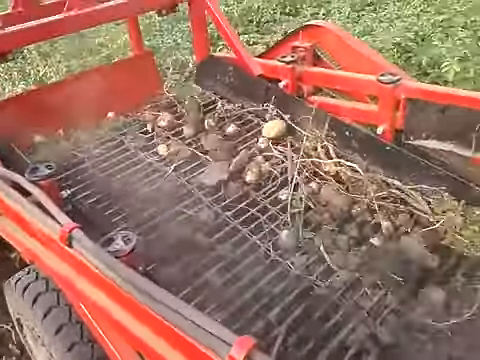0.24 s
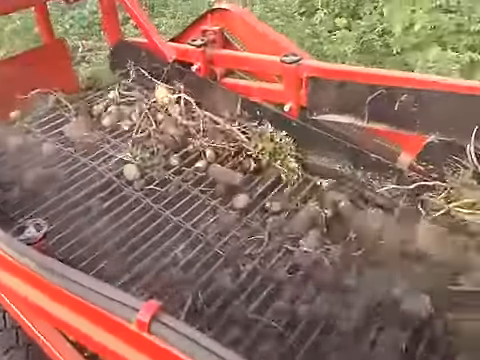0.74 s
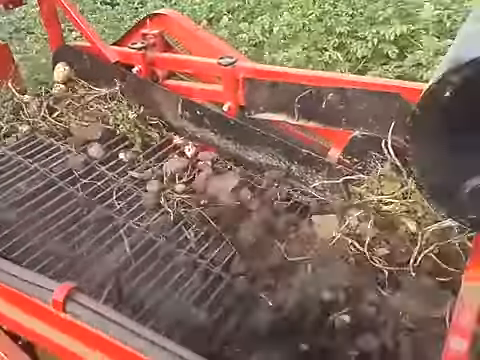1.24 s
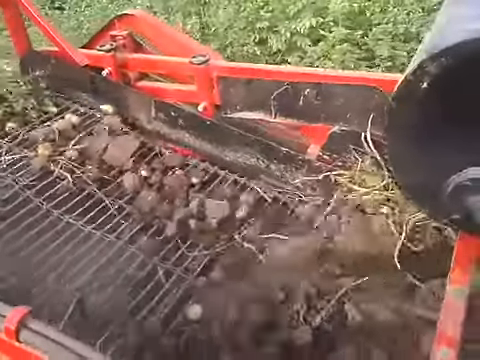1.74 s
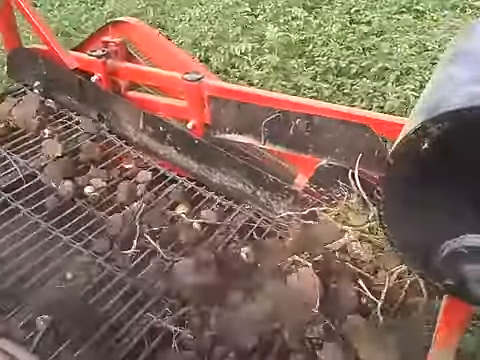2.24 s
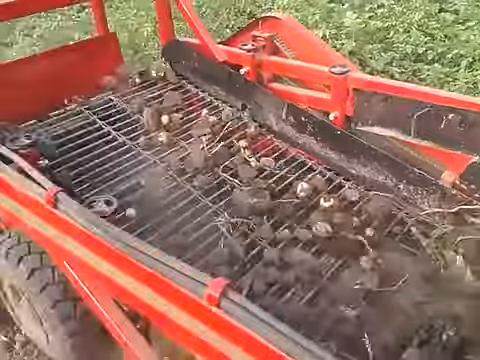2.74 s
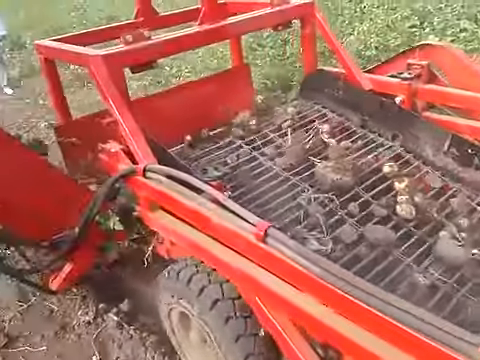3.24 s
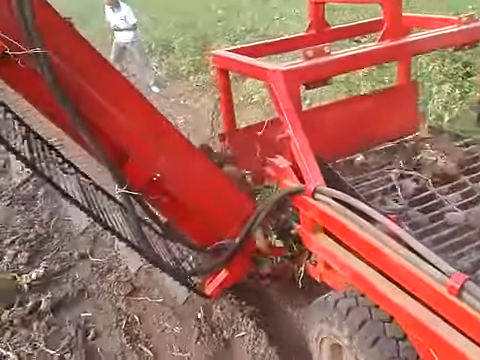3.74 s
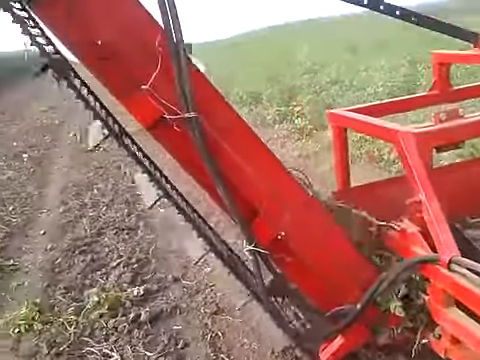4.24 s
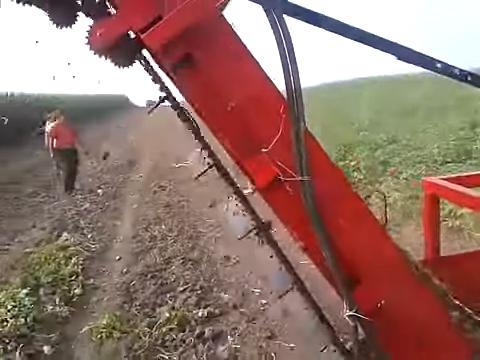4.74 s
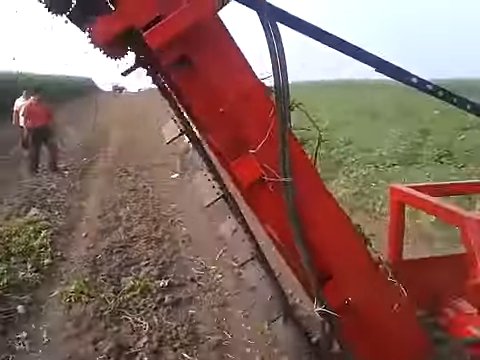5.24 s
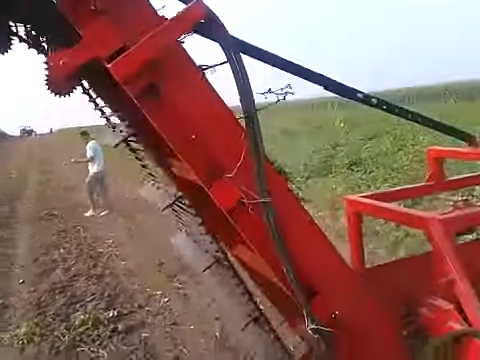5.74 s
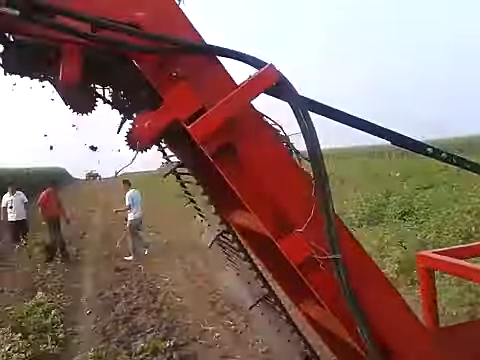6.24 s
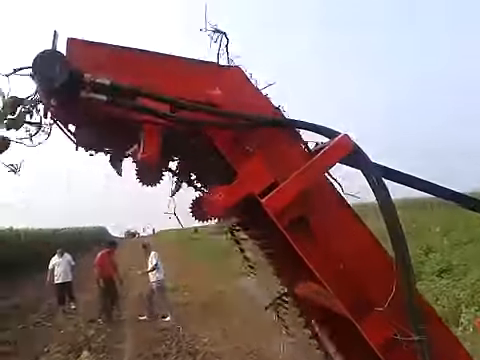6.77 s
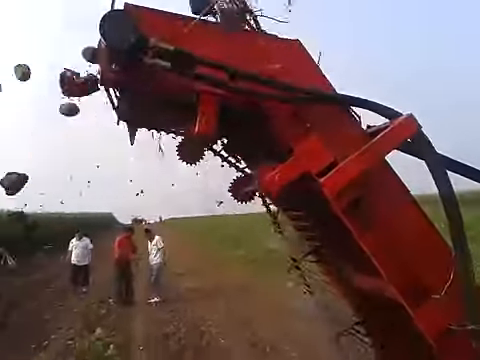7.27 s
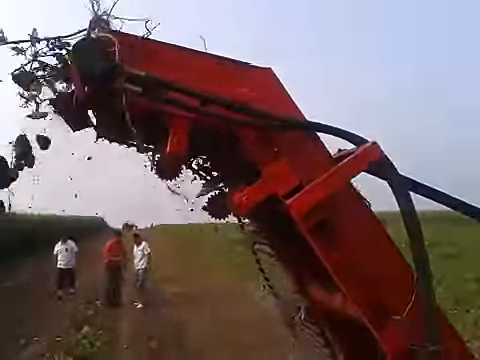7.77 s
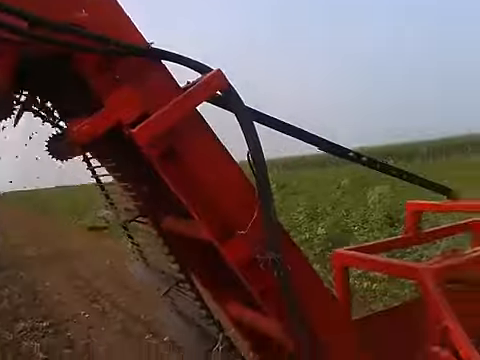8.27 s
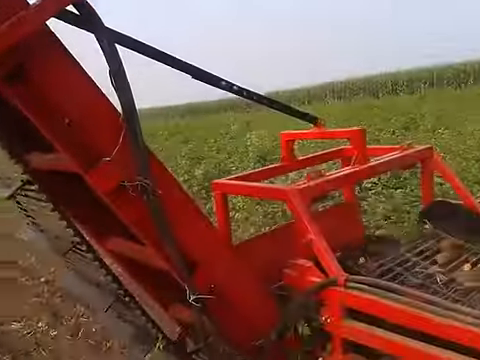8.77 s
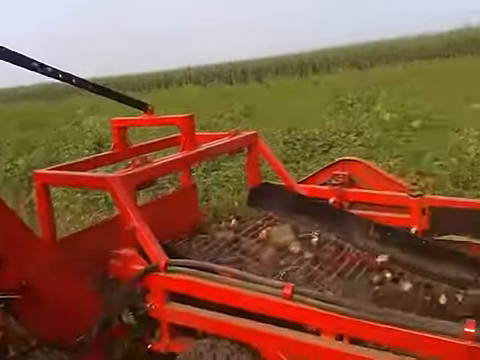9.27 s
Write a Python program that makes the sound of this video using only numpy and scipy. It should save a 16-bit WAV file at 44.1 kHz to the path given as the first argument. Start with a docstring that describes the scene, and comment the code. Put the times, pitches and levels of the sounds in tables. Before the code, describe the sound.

Continuous rough roar of earth tumbling on a shaking metal sieve, rods knocking about eighteen times a second, with hissing grit and thin squeaks.

```python
"""A rough roar of soil and clods over the rod web of a potato harvester, with rods knocking 18 times a second.
The soil layers are flickering coloured noise; the steel frame is noise through narrow resonances. Each rod slaps
the sprocket with a noise rattle and a short clank; dry links squeak as brief rising tones, small parts clatter as
short rings, and now and then a low thump comes through. Heard from the tractor platform by a small mono
microphone that overloads on the peaks."""
import sys
import numpy as np
from scipy import signal
from scipy.fft import rfft, irfft, next_fast_len
from scipy.io import wavfile
from scipy.ndimage import uniform_filter1d

SR = 44100
rng = np.random.default_rng(int(sys.argv[2]) if len(sys.argv) > 2 else 0)


def unload_wav(signal):
    """Save mono or channel-first audio to the path in sys.argv[1] as 16-bit WAV at rate SR, clipped to [-1, 1]."""
    wavfile.write(
        sys.argv[1],
        SR,
        np.round(np.clip(np.atleast_2d(signal).T, -1, 1) * 32767).astype(np.int16),
    )


N = 419391

# progress of the rods past the sprocket: time_s [s], rods_passed [count so far]
ROD_PROGRESS = [(0, .25), (3.5, 63.88), (5.5, 100.13), (6, 109.0), (7.5, 136.32), (8.3, 150.66),
                (9.5, 172.25)]
# spectrum of fine grit, and of the thin ticks of the rods: freq_hz [Hz], level_db [dB]
GRIT_SPECTRUM = [(6500, -39), (8500, 5.5), (11000, 1.5), (13000, -9.5), (15700, -6)]


def undb(db):
    """Decibels to gain."""
    return 10 ** (np.asarray(db) / 20)


def unit(x):
    """Scaled to rms 1."""
    return x / np.sqrt(np.mean(x ** 2))


def colour(x, points):
    """Shapes x with a spectrum of (Hz, dB) points, joined straight on a log frequency axis."""
    size = next_fast_len(N)
    hz, db = np.transpose(points)
    log_hz = np.log(np.maximum(np.arange(size // 2 + 1) * SR / size, 1))
    gain = undb(np.interp(log_hz, np.log(hz), db, left=-80))
    return irfft(rfft(x, size) * gain, size)[:N]


def coloured_noise(points):
    """White noise shaped by a spectrum, rms 1."""
    return unit(colour(rng.standard_normal(N), points))


def walk(rate):
    """Random levels joined smoothly, rate new ones a second; spread near 1."""
    step = int(SR / rate)
    levels = rng.standard_normal(N // step + 2)
    joined = np.interp(np.arange(N) / step, np.arange(N // step + 2), levels)
    return 1.6 * uniform_filter1d(joined, step)


def stream(points, flicker_db, rate):
    """Dense falling soil: coloured noise whose level flickers."""
    return undb(flicker_db * walk(rate)) * coloured_noise(points)


def ring(x, hz, width_hz):
    """x through one resonance, rms 1."""
    return unit(signal.lfilter(*signal.iirpeak(hz, hz / width_hz, SR), x))


def bursts(s, db, t60, rise_s):
    """Envelope that rises quickly at each time and dies away."""
    hits = np.zeros(N)
    at = np.clip((np.asarray(s) * SR).astype(int), 0, N - 1)
    np.add.at(hits, at, undb(db))
    t = np.arange(int(.15 * SR)) / SR
    shape = (1 - np.exp(-t / rise_s)) * np.exp(-np.log(1000) * t / t60)
    return signal.fftconvolve(hits, shape)[:N]


def add(out, s, hz, db, half_s, glide):
    """Adds a bell-shaped blip of tone centred on s; positive glide rises, negative falls."""
    t = np.arange(-int(half_s * SR), int(half_s * SR)) / SR
    at = int(s * SR) - len(t) // 2
    if at >= 0 and at + len(t) <= N:
        tone = np.sin(2 * np.pi * hz * t * (1 + glide * t / half_s))
        out[at:at + len(t)] += undb(db) * np.hanning(len(t)) * tone


def grains(s, hz, db, t60, rough, size=600):
    """Short rings, each with its own pitch and decay, faded out by size samples; rough blurs them to a scrape."""
    t = np.arange(size) / SR
    hz, db, t60 = (np.asarray(v)[:, None] for v in (hz, db, t60))
    wander = rough * np.cumsum(rng.standard_normal((len(s), len(t))), axis=1)
    attack = 1 - np.exp(-t * hz / 2.3)
    decay = np.exp(-np.log(1000) * t / t60) * (1 - t / t[-1])
    tone = np.sin(2 * np.pi * hz * t + wander) * attack * decay
    at = (np.asarray(s)[:, None] * SR).astype(int) + np.arange(len(t))
    return np.bincount(at.ravel(), (undb(db) * tone).ravel(), N + 2 * len(t))[:N]


def scattered(count, *ranges):
    """Random rows: a time, then one value from each range."""
    lo, hi = np.transpose([(0, N / SR), *ranges])
    return lo + (hi - lo) * rng.random((count, len(lo)))


def rod_times(jitter_s):
    """When each rod passes the sprocket, slightly uneven."""
    s, count = np.transpose(ROD_PROGRESS)
    even_s = np.interp(np.arange(1, int(count[-1]) + 1), count, s)
    return even_s + jitter_s * rng.standard_normal(len(even_s))


def clod_tumble(body):
    """Clods tumbling on the web: mid-range noise, stirred by the slaps, receding as the microphone turns away."""
    # freq_hz [Hz], level_db [dB]
    tumble_spectrum = [(350, -4), (550, -17), (680, 1.5), (1000, 5), (1250, 3.5), (1600, -2.5),
                       (2500, -23.5)]
    start_db, fade_db_per_s = -17.5, 0.33  # before the stirring
    level = undb(start_db - fade_db_per_s * np.arange(N) / SR)
    return level * (.75 + 0.95 * body) * stream(tumble_spectrum, 0.58, 13)


def soil_rush(body):
    """Soil rushing over the rods: brighter noise, stirred by the slaps, that drops abruptly and slowly fades."""
    # freq_hz [Hz], level_db [dB]
    rush_spectrum = [(700, -27), (1100, -4), (1500, -1), (2000, 2), (2600, -3.5), (3200, -5.5), (4500, -7),
                     (6000, -25)]
    start_db, drop_db, fade_db_per_s = -14.5, 6.5, 0.16  # before the stirring
    t = np.arange(N) / SR
    dropped = np.interp(t, (1.81, 1.84), (0, 1))  # s
    level = undb(start_db - drop_db * dropped - fade_db_per_s * t)
    return level * (0.93 + 0.84 * body) * stream(rush_spectrum, 0.79, 14)


def web_hiss():
    """Hiss of the rod web: flickering treble noise that comes up early on."""
    # freq_hz [Hz], level_db [dB]
    hiss_spectrum = [(1500, -45), (2200, -2), (3700, -2), (4600, -0.5), (5600, 1.5), (6500, -4.5),
                     (7700, -10), (9500, -17), (12000, -36)]
    full_db, rise_db = -17.5, 2.5
    still_to_rise = np.interp(np.arange(N) / SR, (1.2, 1.5), (1, 0))  # s
    return undb(full_db - rise_db * still_to_rise) * stream(hiss_spectrum, 1.0, 16)


def frame(shake):
    """Panel rings, shaken by the load and harder at each knock; each comes and goes."""
    # rings of the panels: pitch_hz [Hz], width_hz [Hz], level_db [dB],
    # drift_db_per_s [dB per s, about mid-scene, as the microphone turns]
    panel_rings = [(209, 14, -46, 0.4), (246.5, 4.6, -45, 1), (296, 12, -42.5, 0.3),
                   (369, 19.5, -32.5, 0.2), (435, 16, -33.5, 0), (505, 49, -30.5, 0.15),
                   (573, 28, -32, -0.66), (659, 12.4, -31, 0.87), (704.4, 20, -28.5, -.5),
                   (785, 15, -30.5, -0.7), (861, 34, -31, 0), (887.6, 9.9, -31.5, 0), (999, 25, -28.5, -.3),
                   (1155, 9.1, -36, -2.3)]
    # how strongly the panels reach the turning microphone: time_s [s], level_db [dB]
    panel_facing = [(.5, -2), (1.3, 0), (2.2, 1), (3.2, 1), (4.5, -1.5), (6.5, -2.5), (8, -1)]
    out, t = 0, np.arange(N) / SR
    facing_db = np.interp(t, *np.transpose(panel_facing))
    for hz, width_hz, db, drift_db_per_s in panel_rings:
        drift_db = drift_db_per_s * (t - t[-1] / 2)
        swell = undb(db + facing_db + drift_db + 2.14 * walk(2.97))
        load = (1 + 0.65 * shake) * rng.standard_normal(N)
        out = out + swell * ring(load, hz, width_hz)
    return out


def slaps():
    """Rods slapping the sprocket: rows of time, strike level, brightness and pitch."""
    # hard or bright slaps at set times: time_s [s], strike_db [dB], brightness_db [dB], pitch_hz [Hz]
    set_slaps = [(0.0385, -5.5, 9, 5070), (0.2045, -3.5, -2, 4920), (0.264, -4.5, 0, 5100),
                 (0.3739, -6, 4.5, 4860), (0.4295, -5.5, -1.5, 4930), (0.817, -4, 0, 4570),
                 (1.101, -4.5, -1, 4880), (1.2043, -9, 7, 4930), (1.2525, -4.5, 2, 4730),
                 (1.4191, -5, 2, 5080), (1.852, -4.5, 3, 5600), (2.0829, -4.5, 3, 5620),
                 (2.135, -1.5, 1, 5080), (2.191, -4.5, -2, 4750), (2.521, -5, .5, 4760),
                 (2.676, -6, 0, 6060), (2.731, -6, 4.5, 5470), (2.9578, -5, 6, 5950),
                 (3.1247, -5.5, 8, 5700), (3.2346, -4.5, 6, 5220), (3.5618, -4.5, 6, 5340),
                 (3.9562, -5, 0, 5100), (4.0059, -5, .5, 4880), (4.836, -5, -5.5, 4260),
                 (5.0427, -5.5, 1.5, 5140), (5.129, -2.5, -1, 5400), (5.3235, -5.5, 1, 5430),
                 (6.119, -5, 9, 4920), (6.6055, -5.5, 1, 5630), (6.764, -6, 1, 5530), (7.428, -6, -6, 5190),
                 (8.428, -4.5, 2, 5630), (8.4902, -4.5, 6, 5500), (9.435, -5.5, 5, 5700)]
    placed = np.transpose(set_slaps)
    rod_s = rod_times(jitter_s=.005)
    chance = rng.standard_normal((3, len(rod_s)))
    rod_db = np.minimum(-9 + 2.5 * chance[0], -6.5)  # capped
    rod_hz = 5196 + 500 * chance[2]
    regular = np.array([rod_s, rod_db, 2.0 * chance[1], rod_hz])
    apart = np.abs(rod_s[:, None] - placed[0]).min(axis=1) > .02  # s, a set slap replaces a regular one
    return np.c_[placed, regular[:, apart]]


def beat(s, db, bright_db):
    """Envelopes of the slaps: a longer body and a shorter bright edge."""
    body = bursts(s, db, t60=.1, rise_s=.002)
    edge = bursts(s, db + bright_db, t60=0.055, rise_s=0.0037)
    return body, edge


def knocks(body, edge, s, db, hz):
    """Each slap is a short rattle and a clank at the pitch of its rod."""
    # rattle: freq_hz [Hz], level_db [dB]
    rattle_spectrum = [(500, -28), (1200, -2.5), (2500, -0.5), (4000, 0.5), (5500, 3), (7000, 0),
                       (9000, -6.5), (11000, -32)]
    # bright edge: freq_hz [Hz], level_db [dB]
    edge_spectrum = [(5000, -42), (7000, -15), (9500, -4.5), (12000, -8.5), (15500, -10.5)]
    rattle = undb(-6) * body * coloured_noise(rattle_spectrum)
    snap = undb(-12) * edge * coloured_noise(edge_spectrum)
    clank = grains(s + .002, hz, db - 9.5, 0.36 + 0 * s, rough=.15, size=1200)
    return rattle + snap + clank


def clods():
    """Big clods drop on the web and the bars ring dully."""
    # clods at set times: time_s [s], blow_db [dB], pitch_hz [Hz]
    set_clods = [(0.156, -2, 603), (1.276, -1, 900), (1.389, -2, 970), (1.81, -2, 985), (2.099, -10, 1070),
                 (2.461, 0.5, 780), (3.049, -5.5, 765), (3.318, -6, 450), (3.351, -3, 695),
                 (3.626, -9, 776), (4.608, -1, 730), (6.659, -11, 1000), (6.913, -5.5, 890),
                 (7.311, -9, 660), (7.481, -5, 665), (8.772, -6.5, 635), (8.825, -6, 977), (8.981, -1, 706)]
    chance_clods = scattered(28, (-6, -8), (620, 1132))  # dB, Hz
    s, db, hz = np.r_[set_clods, chance_clods].T
    return grains(s, hz, db, 0.05 + 0 * s, rough=0.019, size=2000)


def clatter(shake, count=7000, spread_db=3.0):
    """Stones, bolts and rods of all sizes tick at random, more often on a knock and in waves."""
    # loose parts by size: pitch_hz [Hz], light_blow_db [dB]
    part_levels = [(700, -36.5), (1500, -19.5), (2500, -20), (4000, -20.5), (5500, -14), (7000, -25),
                   (9500, -22.5), (12000, -31), (15400, -35)]
    hz, db = np.transpose(part_levels)
    odds = np.cumsum((1 + 6.0 * shake) * undb(2.5 * walk(6)))
    when, size, blow, damping = rng.random((count, 4)).T
    s = np.searchsorted(odds, when * odds[-1]) / SR
    pitch = hz[0] * (hz[-1] / hz[0]) ** size
    light_db = np.interp(np.log(pitch), np.log(hz), db)
    blow_db = light_db - spread_db * np.log(blow + 0.0076)  # a few land much harder
    return grains(s, pitch, blow_db, 0.0079 + .025 * damping, rough=0.081)


def squeaks():
    """Brief rising whistles of dry steel, unsteady in strength, the loud ones among fainter fragments."""
    # the loudest: time_s [s], pitch_hz [Hz], level_db [dB before the unsteadiness]
    loud_squeaks = [(0.136, 9070, -13.5), (0.214, 4800, -14), (0.42, 11940, -21), (0.472, 7120, -21),
                    (0.709, 10220, -20), (0.809, 9650, -19), (1.137, 9760, -20), (1.335, 10800, -18),
                    (1.355, 9350, -15), (1.65, 10040, -16), (1.736, 9100, -18.5), (2.454, 9600, -16),
                    (3.154, 8770, -19), (3.266, 9240, -18), (3.28, 10000, -18.5), (3.603, 10500, -18),
                    (3.988, 10100, -18), (4.089, 6820, -17.5), (4.149, 9650, -19), (4.693, 9620, -20),
                    (4.759, 8730, -20), (4.768, 9550, -16), (5.291, 10910, -17), (5.319, 10680, -17),
                    (5.717, 9370, -20), (6.007, 10140, -22), (6.25, 6090, -17), (6.38, 8960, -21),
                    (7.234, 9800, -19.5), (7.551, 5420, -23), (8.656, 5900, -16), (8.848, 6090, -20),
                    (9.31, 10600, -19)]
    out = np.zeros(N)
    s, hz, db = np.transpose(loud_squeaks + loud_squeaks)  # two fragments each
    chance = rng.standard_normal((3, len(s)))
    near_s = s + .025 * chance[0]
    near_hz = hz * (1 + 0.041 * chance[1])
    fragments = np.c_[near_s, near_hz, db - 7.5 + 2 * chance[2]]
    faint = scattered(30, (8950, 11960), (-33, -26.5))  # Hz, dB
    for s, hz, db in np.r_[loud_squeaks, fragments, faint]:
        add(out, s, hz, db, 134 / hz, .006)  # about 134 cycles at half height
    return out * (1 + 0.5 * walk(600))


def rod_ticks():
    """A thin tick of bright noise, uneven in strength, as each rod seats on its tooth."""
    s = rod_times(jitter_s=.004)
    db = -13 + 3.3 * rng.standard_normal(len(s))
    return bursts(s, db, t60=0.017, rise_s=.0015) * coloured_noise(GRIT_SPECTRUM)


def grit(count=900):
    """Fine grit pours in gusts, slowly fading; single pebbles tick on the bars."""
    # the finest dust, more fitful: freq_hz [Hz], level_db [dB]
    dust_spectrum = [(9500, -30), (11500, -2), (13500, 1), (15700, -5)]
    start_db, fade_db_per_s = -28.5, 0.34  # before the pebbles
    when, blow = rng.random((count, 2)).T
    pebbles = bursts(when * N / SR, -4 - 3.9 * np.log(blow + .01), t60=0.025, rise_s=.002)
    pour = stream(GRIT_SPECTRUM, 2.7, 14) + undb(-5.5) * stream(dust_spectrum, 3.7, 25)
    level = undb(start_db - fade_db_per_s * np.arange(N) / SR)
    return level * (0.5 + pebbles) * pour


def thumps():
    """A dull push of about two falling cycles inside a puff of low noise."""
    # time_s [s], pitch_hz [Hz], peak_db [dB, of the push]
    low_thumps = [(1.992, 265, -15), (2.0, 418, -8), (4.213, 180, -26), (4.278, 152, -26),
                  (7.401, 189, -27), (7.489, 264, -12), (7.498, 399, -9), (7.715, 200, -23),
                  (8.655, 520, -12), (8.685, 540, -7.5), (8.699, 198, -22), (8.755, 180, -22)]
    push = np.zeros(N)
    for s, hz, db in low_thumps:
        add(push, s, hz, db, 2.0 / hz, -.15)
    s, _, db = np.transpose(low_thumps)
    swell = bursts(s - .008, db - 8.5, t60=0.11, rise_s=0.0032)
    return push + swell * ring(rng.standard_normal(N), 380.0, 450.)


def shudders():
    """Loose swells of low noise around some of the thumps, through two equal resonances."""
    # time_s [s], level_db [dB at the top of the swell]
    low_shudders = [(4.25, -31), (7.46, -32), (8.7, -33)]
    hz, width_hz, spread_s = 220, 200, .06
    t = np.arange(N) / SR
    swell = sum(undb(db) * np.exp(-((t - s) / spread_s) ** 2) for s, db in low_shudders)
    once = ring(rng.standard_normal(N), hz, width_hz)
    return swell * ring(once, hz, width_hz)


def rumble():
    """Deep bed of moving soil: low noise at a steady level with a slight flicker."""
    # freq_hz [Hz], level_db [dB]
    rumble_spectrum = [(40, -50), (90, -56), (150, -19.5), (220, -7.5), (340, -1.5), (400, -0.5),
                       (600, 3.5), (800, -4), (1200, -18)]
    return undb(-23.5) * stream(rumble_spectrum, 0.94, 12)


def scene():
    """All parts of the machine, the same in both channels; the slaps shake the soil, frame and loose parts."""
    s, db, bright_db, hz = slaps()
    body, edge = beat(s, db, bright_db)
    soil = clod_tumble(body) + soil_rush(body) + clods() + rumble()
    web = web_hiss() + grit() + squeaks()
    rods = knocks(body, edge, s, db, hz) + rod_ticks()
    steel = frame(body) + clatter(body)
    return np.tile(soil + web + rods + steel + thumps() + shudders(), (2, 1))


def record(dry):
    """A slightly lopsided input stage flattens the peaks; the bottom rolls off and the top is cut."""
    ceiling, knee = .7, 7  # full-scale fraction; higher knee bends more sharply
    x = dry[0] + 0.018 * (dry[0] ** 2 - np.mean(dry[0] ** 2))
    x = x / (1 + np.abs(x / ceiling) ** knee) ** (1 / knee)
    bottom = signal.sosfiltfilt(signal.butter(2, 110., fs=SR, output="sos"), x)
    x = x - 0.3 * bottom
    top_cut = signal.ellip(8, .1, 50, 15750, fs=SR, output="sos")  # Hz
    return np.tile(signal.sosfiltfilt(top_cut, x), (2, 1))


dry = scene()
out = record(dry)
unload_wav(out)
```